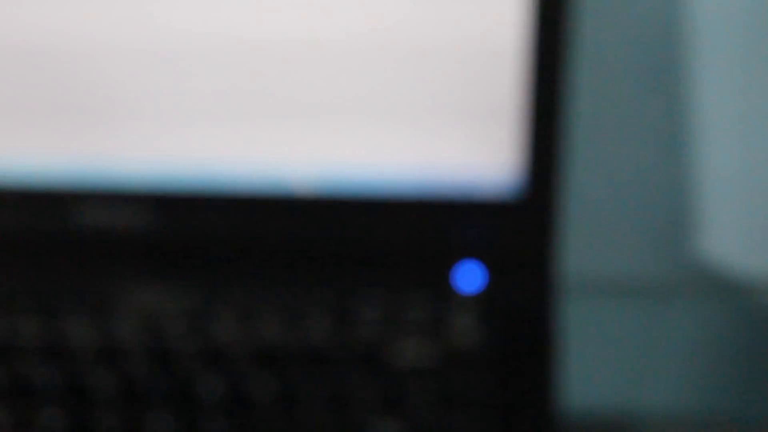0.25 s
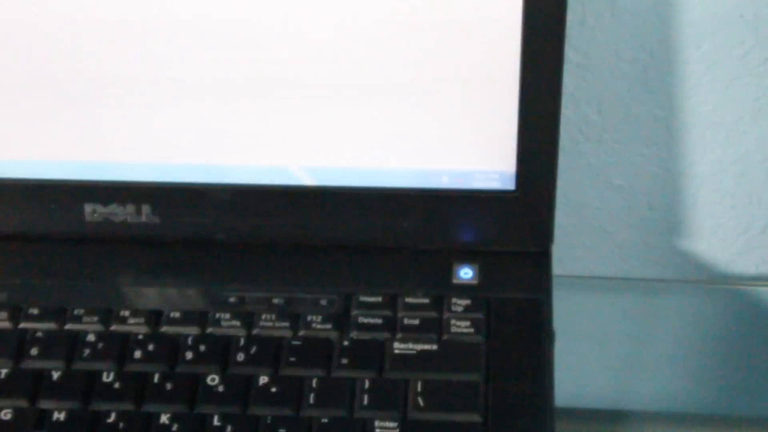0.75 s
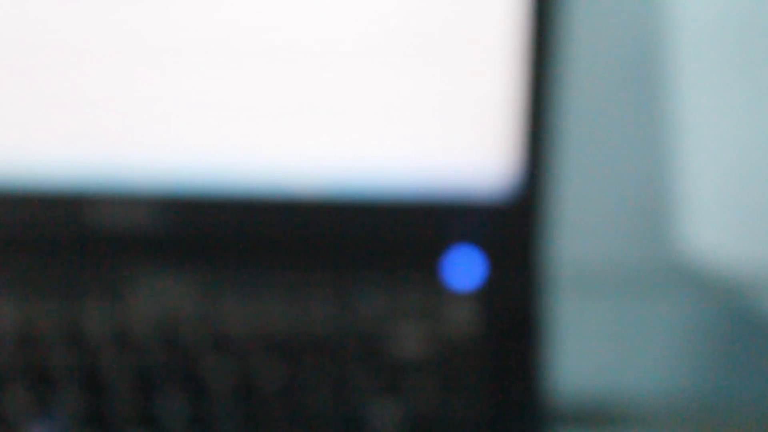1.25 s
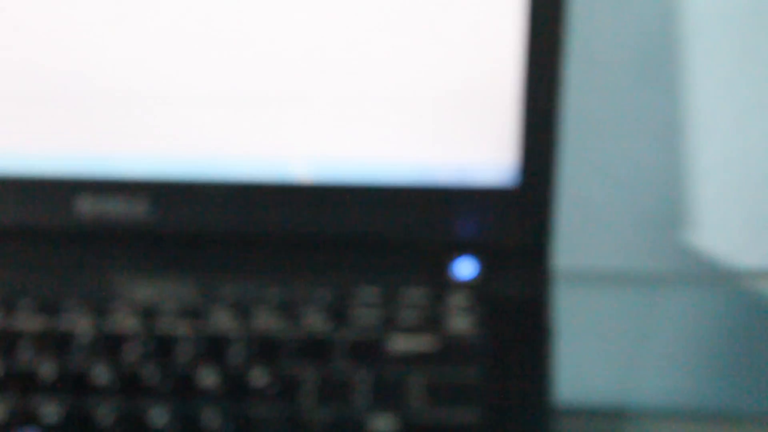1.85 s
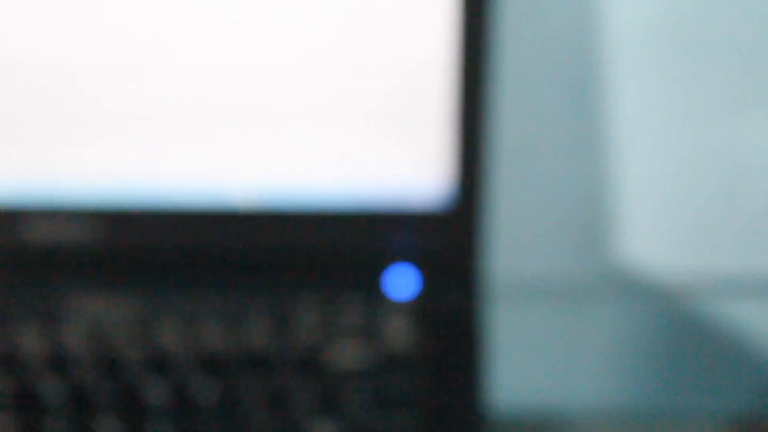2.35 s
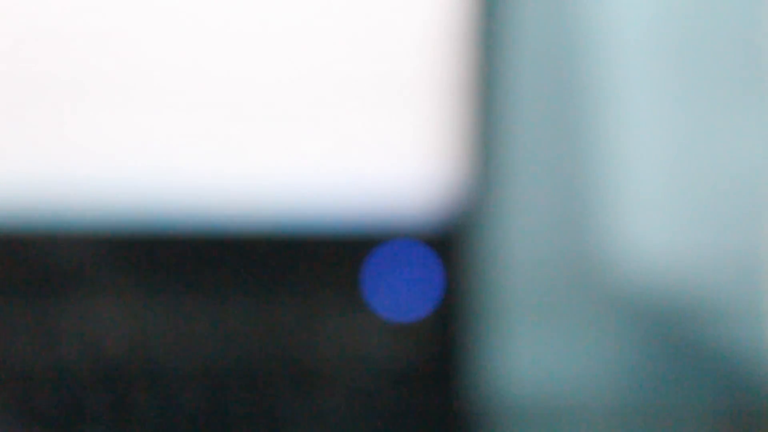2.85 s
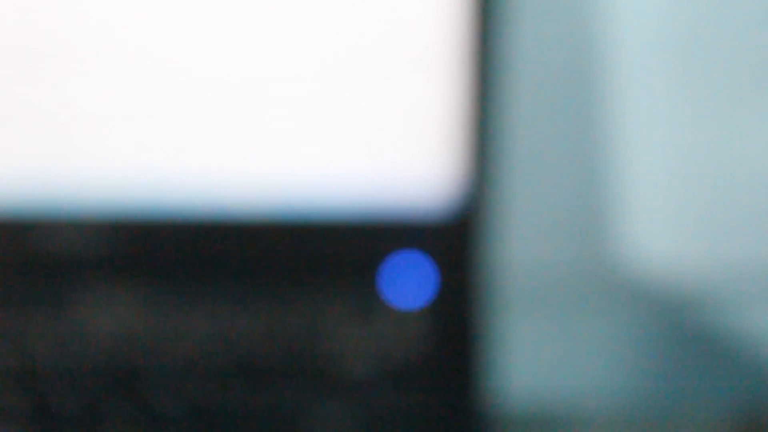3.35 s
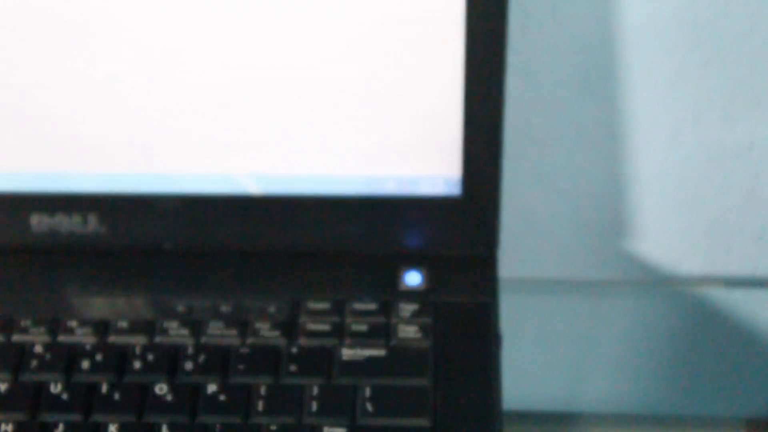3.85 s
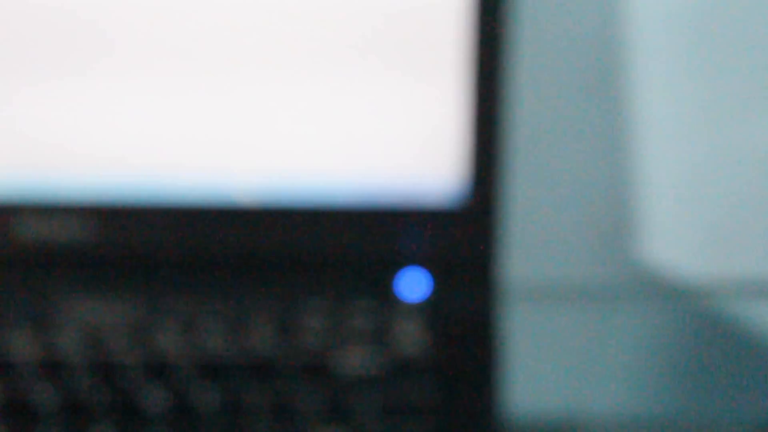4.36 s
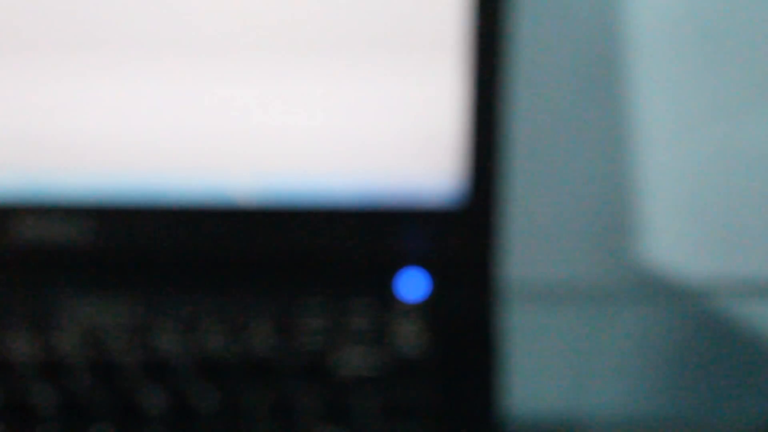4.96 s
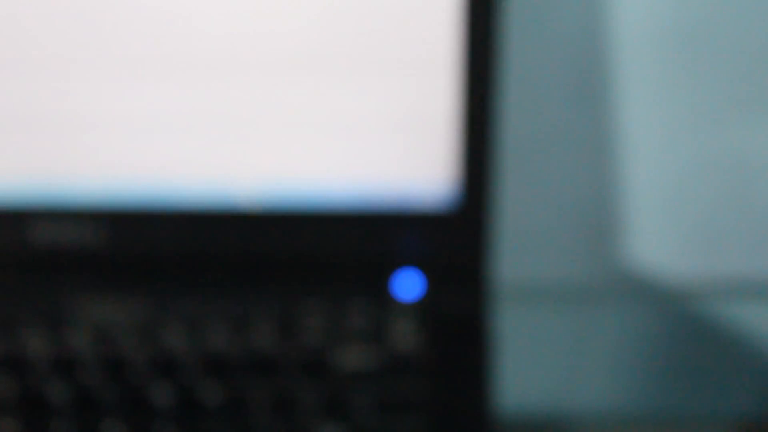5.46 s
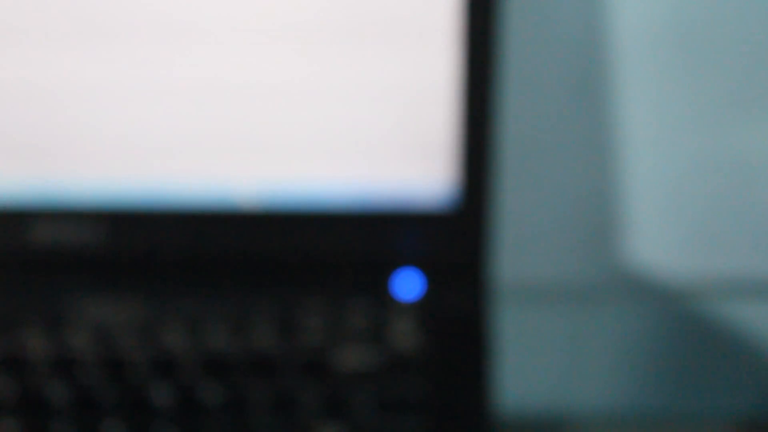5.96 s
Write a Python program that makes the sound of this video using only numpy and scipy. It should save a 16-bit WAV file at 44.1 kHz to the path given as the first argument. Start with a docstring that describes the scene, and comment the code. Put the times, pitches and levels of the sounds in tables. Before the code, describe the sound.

A tiny lens motor whirs harshly in two bursts, chatters through two trains of quick nudges, then buzzes once more over a low indoor hum.

```python
"""Camera lens hunting for focus

A camera hunts for focus in a quiet room, heard by its own microphone through the body. The lens motor makes
three long runs and two trains of short nudges, one train in each direction. Uneven gear-tooth strikes and a
tooth-mesh whine ring the lens housing, with a scraping barrel, loose gears and knocks. Shaped noise gives
the low fan-like hum and faint hiss underneath, and tiny ticks of the camera body."""
import sys
import numpy as np
from scipy import signal
from scipy.fft import rfft, irfft
from scipy.io import wavfile

SR = 44100
rng = np.random.default_rng(int(sys.argv[2]) if len(sys.argv) > 2 else 0)


def dump(signal):
    """Clip the signal to [-1, 1] and save it as 16-bit WAV at the path in sys.argv[1]."""
    limited = np.clip(np.atleast_2d(signal).T, -1, 1)
    pcm = np.round(limited * 32767).astype(np.int16)
    wavfile.write(sys.argv[1], SR, pcm)


N = 273420  # length in samples
TEETH = 12  # on the motor pinion


def undb(db):
    """Decibels to gain."""
    return 10 ** (np.asarray(db) / 20)


def level(x, db):
    """Set the rms level."""
    return x * undb(db) / np.sqrt(np.mean(x ** 2))


def resonance(f, hz, width):
    """Power response of one resonance."""
    return 1 / (1 + ((f / hz - hz / f) * hz / width) ** 2)


def frequencies(size):
    """Bin frequencies of a real transform, kept above zero."""
    return np.maximum(np.arange(size // 2 + 1) * SR / size, 1)


def noise(gain):
    """Noise with the given gain in each bin."""
    return irfft(rfft(rng.standard_normal(N)) * gain, N)


def walk(rate):
    """Smooth random drift with a spread of 1, slower than about `rate` in Hz."""
    return level(noise(1 / (1 + (frequencies(N) / rate) ** 4)), 0)


def burst(t, start, t60):
    """A sudden noisy scrape that falls 60 dB in t60 seconds."""
    decay = np.exp(-np.log(1000) * np.maximum(t - start, 0) / t60)
    return (t >= start) * decay * rng.standard_normal(N)


def filtered(x, order, hz, kind="low"):
    """Butterworth filter."""
    return signal.sosfilt(signal.butter(order, hz, btype=kind, fs=SR, output="sos"), x)


# Colour of the broad room noise and microphone hiss.
# Each row: frequency in Hz, relative density in dB per Hz.
AIR = [(20, -31), (60, 4), (100, -19), (300, -2.5), (460, -1.5), (690, -2.5), (820, 1.5), (1000, -0.5),
       (1250, -5), (1600, -5.5), (2600, -18.5), (5500, -25), (11000, -30), (15500, -33)]
# Resonances in the hum.
# Each row: centre in Hz, width setting in Hz (doubled, then narrowed by squaring), relative peak in dB.
HUM = [(59.4, 14, -9.5), (71.6, 28, -11.5), (133, 15, -1.5), (167.2, 16, -0.5), (217.3, 9.9, 0),
       (260, 21, 2), (306, 8.2, 2.5), (322, 16, -11), (357.4, 26, 1), (406.6, 6.4, -2)]


def background(t, hum_db=-39, air_db=-45.5, early_db=4, settle_s=0.17):
    """A steady hum of narrow noisy resonances, and wavering airy noise that settles in the first moments."""
    f = frequencies(N)
    hum_power = sum(undb(db) ** 2 * resonance(f, hz, 2 * width) ** 2 for hz, width, db in HUM)
    hum = noise(np.sqrt(hum_power))
    air_hz, air_shape = np.transpose(AIR)
    air = noise(undb(np.interp(np.log(f), np.log(air_hz), air_shape)))
    swell_db = early_db * np.exp(-t / settle_s) + 0.19 * walk(6.3)
    return level(hum, hum_db) + level(air, air_db) * undb(swell_db)


def room(x, t, t60=0.42, wet_db=-29, damp_hz=6000):
    """A weak, dull reverberation from the walls: a decaying noise tail."""
    tail = filtered(burst(t, 0.0031, t60)[:SR], 1, damp_hz)
    return signal.fftconvolve(x, undb(wet_db) * tail / np.linalg.norm(tail))[:N]


# Faint ticks of the camera body.
# Each row: start in seconds, relative level in dB, main ring in Hz, 60 dB decay time in seconds.
TICKS = [(.260, -49, 3200, .03), (.319, -48, 11000, .03), (.451, -50, 3500, .02), (.577, -48, 11000, .03),
         (4.653, -51, 4200, .025), (4.681, -52, 8200, .03), (5.650, -51, 4000, .02),
         (6.172, -54, 4200, .02)]


def body_ticks(t, width_hz=1200, broad=.04):
    """Tiny plastic ticks: short noise bursts, each coloured by one main ring over a broad trace."""
    f = frequencies(N)
    out = 0
    for start, db, hz, t60 in TICKS:
        power = resonance(f, hz, width_hz) + broad * resonance(f, 6000, 6000)
        colour = level(np.sqrt(power), db)
        out = out + irfft(rfft(burst(t, start, t60)) * colour, N)
    return out


# Where the gears slip as they come to rest.
# Each row: start in seconds, level in dB before the housing.
SLIPS = [(2.721, -39), (2.750, -45), (3.991, -39)]


def knocks(t, back, t60=0.077, delay_s=.003, out_db=-29.5, back_db=-26):
    """On each reversal the gears cross their play and knock; a few slips join in."""
    reversals = np.flatnonzero(np.diff(back)) + 1
    backlash = [(t[i] + delay_s, back_db if back[i] else out_db) for i in reversals]
    return sum(undb(db) * burst(t, start, t60) for start, db in backlash + SLIPS)


def slack(t, speed, bounce_hz=115, dull_hz=2200):
    """While the motor coasts, the unloaded gears bounce dully in their play."""
    coasting = (np.gradient(speed) < 0) * np.sqrt(speed)
    phase = (bounce_hz * t + 0.145 * walk(24.0)) % 1  # in bounces
    bounces = np.exp(-phase / 0.1)
    return coasting * bounces * filtered(rng.standard_normal(N), 2, dull_hz)


# The lens barrel scraping in its guide, first row driving out, second driving back.
# Each row: centre in Hz, width in Hz, level in dB before the judder and housing.
BARREL = [(3570, 1430, -34.5), (1530, 330, -37.5)]


def barrel(speed):
    """The barrel judders at middling speed and slides freely at full speed."""
    f = frequencies(N)
    judder = speed ** 2 * (1 - speed)
    scrape = [level(noise(np.sqrt(resonance(f, hz, width))), db) for hz, width, db in BARREL]
    return np.array(scrape) * judder / judder.max()


# Long runs of the motor.
# Each row: start in seconds, powered seconds, coasting seconds, direction (0 out, 1 back).
RUNS = [(.732, .356, .075, 0), (1.207, .380, .070, 1), (5.151, .204, .050, 0)]
# Trains of nudges.
# Each row: start in seconds, usual powered seconds per nudge, coasting seconds, level trim in dB,
# direction (0 out, 1 back).
TRAINS = [(1.842, .0355, .081, 1.5, 0), (3.2425, .040, .091, 1.38, 1)]
RUN_DB = -0.03  # level trim of a run
NUDGES_PER_TRAIN, NUDGE_EVERY_S = 9, .1335
# the first nudge is longer, to take up the slack; the last is a short trim (shares of the powered time)
FIRST_NUDGE, LAST_NUDGE = 1.18, .68
NUDGE_GROWTH_DB = 0.02  # each nudge is a little louder than the one before


def moves():
    """Runs and evenly clocked nudges in time order: start, powered and coasting s, trim dB, direction."""
    rows = [(start, powered, coasting, RUN_DB, direction) for start, powered, coasting, direction in RUNS]
    for start, powered, coasting, db, direction in TRAINS:
        shares = [FIRST_NUDGE] + [1] * (NUDGES_PER_TRAIN - 2) + [LAST_NUDGE]
        for k, share in enumerate(shares):
            growth = NUDGE_GROWTH_DB * (k - NUDGES_PER_TRAIN // 2)
            rows.append((start + k * NUDGE_EVERY_S, powered * share, coasting, db + growth, direction))
    return sorted(rows)


def motion(t, spin_up_s=.0226):
    """Share of full speed, gain and direction: the rotor spins up under power, then friction stops it."""
    speed, gain, back = np.zeros(N), np.ones(N), np.ones(N)
    for start, powered, coasting, db, direction in moves():
        rise = 1 - np.exp(-np.clip(t - start, 0, powered) / spin_up_s)
        speed += rise * np.clip(1 - (t - start - powered) / coasting, 0, 1) ** 2
        gain[t >= start], back[t >= start] = undb(db), direction
    return speed, gain, back


# Full speed driving back, where the load is heavier and uneven.
# Each row: time in seconds, whine at twice the tooth rate in Hz.
BACK_WHINE = [(1.29, 2191), (1.356, 2225), (1.482, 2167), (1.58, 2233)]


def shaft_turns(t, speed, back, out_turns_per_s=98.4):
    """Turns made so far; full speed is steady driving out, lower and wavering driving back."""
    back_rate = np.interp(t, *np.transpose(BACK_WHINE)) / (2 * TEETH)
    return np.cumsum(speed * np.where(back, back_rate, out_turns_per_s)) / SR


# Gear whine on the first multiples of the tooth rate, in order.
# Each row: dB driving out, dB driving back (both before the housing), depth of the once-a-turn throb.
WHINE = [(-54, -54, .3), (-27, -29, .25), (-27.5, -40, .4), (-46, -47, .6), (-41, -52, .6), (-50, -54, .6),
         (-43, -51, .6)]


def whine(turns, speed):
    """The tooth-mesh tone; an off-centre pinion swells it once a turn."""
    mesh = 2 * np.pi * TEETH * turns + .12 * walk(60)
    out, back = 0, 0
    for k, (out_db, back_db, throb) in enumerate(WHINE, 1):
        swell = 1 + throb * np.sin(2 * np.pi * turns)
        tone = np.sin(k * mesh) * swell * undb(1.3 * walk(80))
        out = out + undb(out_db) * tone
        back = back + undb(back_db) * tone
    # driving out, the teeth sing only once they run fast; driving back, the tone grows gradually
    sing = np.array([out * np.interp(speed, [0, .83, .89], [0, .15, 1]), back * speed ** 4])
    return sing * np.where(np.gradient(speed) < 0, .35, 1)  # the teeth unload as the motor coasts


def rubbing(turns, size=400):
    """The same rough gear surface comes round every turn: a buzz on all multiples of the shaft rate."""
    return np.interp(turns % 1, np.arange(size) / size, rng.standard_normal(size), period=1)


def tooth_strikes(turns, scatter_db=1.5, wear_db=2.0, jitter_samples=9):
    """One click as each tooth meets; each tooth has its own fault, and each strike its own scatter."""
    jitter, scatter = rng.standard_normal((2, N))
    teeth = np.flatnonzero(np.diff(np.floor(turns * TEETH)))
    faults = rng.permutation(np.linspace(-np.pi / 2, np.pi / 2, TEETH))  # spread of about 1
    wear = np.resize(faults, len(teeth))
    when = np.clip(teeth + (jitter_samples * jitter[teeth]).astype(int), 0, N - 1)
    strikes = np.zeros(N)
    strikes[when] = undb(wear_db * wear + scatter_db * scatter[teeth])
    return strikes


def rattle(turns, speed, grit_db=-1, throb=0.096, chatter_db=1.24, slow_chatter_db=5.0,
           bright_hz=4200, bright_db=4.0):
    """Worn teeth strike over the rubbing gears; harder and brighter with speed, throbbing once a turn."""
    grit = rng.standard_normal(N) * undb(1.5 * rng.standard_normal(N))
    # chatter_db is the spread at half speed
    chatter = undb((chatter_db + slow_chatter_db * (0.5 - speed)) * walk(260))
    strikes = tooth_strikes(turns)
    strikes = strikes / np.sqrt(np.mean(strikes[speed > .5] ** 2))
    force = strikes + level(grit, grit_db) + rubbing(turns)
    force *= chatter * (1 + throb * np.sin(2 * np.pi * turns))
    dull = filtered(force, 3, bright_hz, "low")
    bright = filtered(force, 3, bright_hz, "high")
    return dull * speed ** 1.26 + undb(bright_db) * bright * speed ** 1.74


# Resonances of the lens housing.
# Each row: centre in Hz, width in Hz, relative peak in dB driving out, relative peak in dB driving back.
HOUSING = [(510, 81, -13.5, -13.5), (907, 110, -10.5, -21), (1230, 470, -10.5, -40), (1310, 230, -8.5, -2),
           (1577, 75, 0, -1), (2076, 197, 0, -2.5), (2270, 110, -9, -18), (2850, 104, -10.5, -6),
           (3164, 69, -3, -5), (3410, 140, -11, -8), (3676, 460, -8.5, -13.5), (4495, 420, -11, -10),
           (4880, 210, -49, -7.5), (5525, 78, -12, -12.5), (5830, 200, -14, -24), (6960, 160, -13.5, -20),
           (8244, 380, -13.5, -15), (10330, 200, -15, -16), (11180, 190, -17.5, -18),
           (11960, 160, -12.5, -9), (12770, 580, -13, -10), (14343, 290, -18, -19)]


def housing(force, direction, low_hz=620, size=4096):
    """Ring the housing; each direction loads other tooth flanks and so weights the resonances differently."""
    f = frequencies(size)
    power = sum(undb(dbs[direction]) ** 2 * resonance(f, hz, width) for hz, width, *dbs in HOUSING)
    power = power / (1 + (low_hz / f) ** 4) + 10 ** -3.2  # weak lows, and a floor at -32 dB
    cepstrum = irfft(np.log(power) / 2)
    cepstrum[1:size // 2] *= 2  # causal: the ring follows the blow
    cepstrum[size // 2 + 1:] = 0
    ring = irfft(np.exp(rfft(cepstrum)))
    return signal.fftconvolve(force, ring / np.linalg.norm(ring))[:N]


def lens_drive(t, rattle_db=-26, slack_out_db=-29, slack_back_db=-22):
    """Rattle, whine, barrel, loose gears and knocks all reach the microphone through the housing."""
    speed, gain, back = motion(t)
    turns = shaft_turns(t, speed, back)
    loose = undb(np.where(back, slack_back_db, slack_out_db)) * slack(t, speed)
    driven = gain * (undb(rattle_db) * rattle(turns, speed) + barrel(speed))
    force_out, force_back = driven + whine(turns, speed) + loose + knocks(t, back)
    return housing(force_out * (1 - back), 0) + housing(force_back * back, 1)


def scene():
    """The lens drive right at the microphone, in a humming room."""
    t = np.arange(N) / SR
    camera = lens_drive(t) + body_ticks(t)
    return (camera + room(camera, t) + background(t))[None]


def record(dry, top_hz=15850):
    """The camera cuts the top of the band."""
    return signal.sosfilt(signal.ellip(10, .2, 80, top_hz, fs=SR, output="sos"), dry)


dry = scene()
out = record(dry)
dump(out)
```